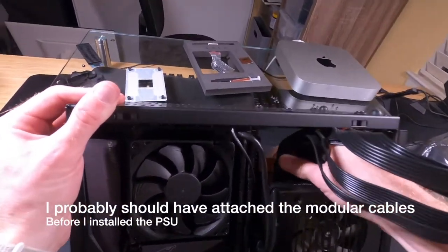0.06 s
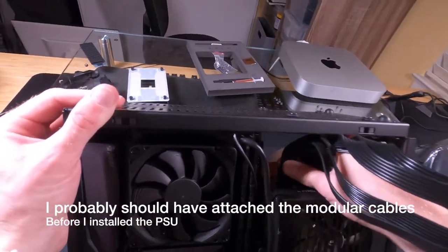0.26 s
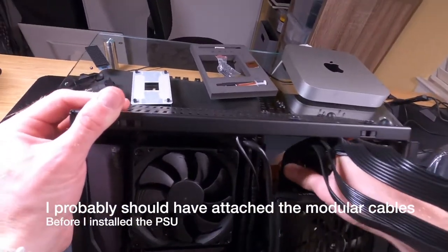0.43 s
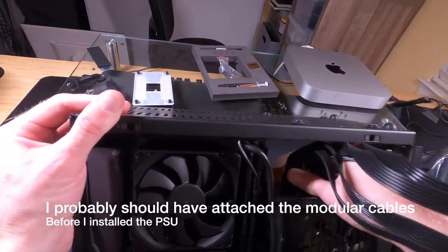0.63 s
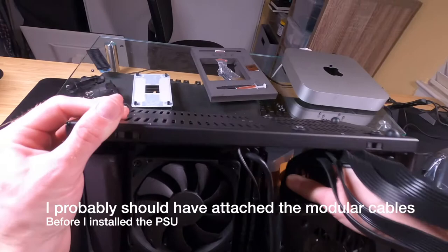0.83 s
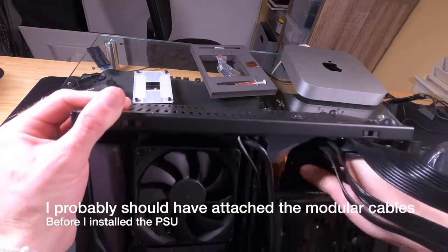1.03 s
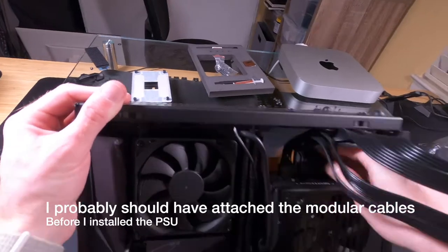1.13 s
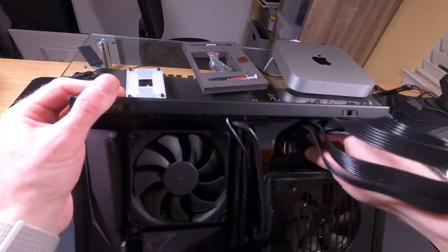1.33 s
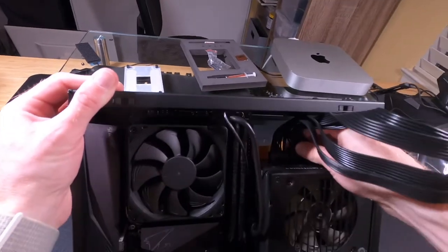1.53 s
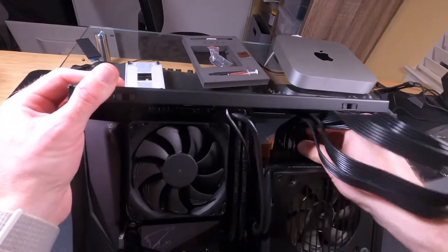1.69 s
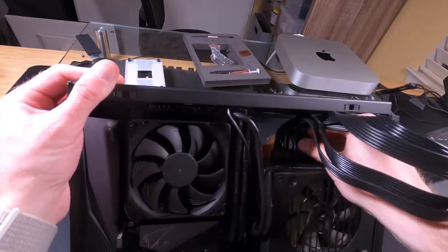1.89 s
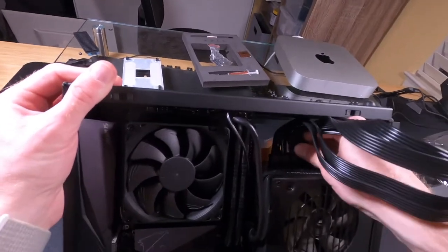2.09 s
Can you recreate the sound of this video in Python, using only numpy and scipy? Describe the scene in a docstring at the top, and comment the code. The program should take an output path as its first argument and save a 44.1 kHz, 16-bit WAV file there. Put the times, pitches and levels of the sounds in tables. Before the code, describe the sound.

A plastic plug creaks, snaps loudly into its socket, then cables rustle in a computer case.

```python
"""First come a low hum and a few faint taps, as stiff power cables are pushed about in a steel computer case.
A plastic plug creaks as it sticks and slips in its socket, snaps home with a loud click that
rings the case, and creaks again. Then the cables rustle, squeak and tap on the panels.
It all happens close by in a small room, over the hum and a low rumble."""
import sys
import numpy as np
from scipy import signal
from scipy.fft import rfft, irfft, next_fast_len
from scipy.io import wavfile
from scipy.ndimage import map_coordinates

SR = 44100
rng = np.random.default_rng(int(sys.argv[2]) if len(sys.argv) > 2 else 0)


def file_out(sig):
    """Save sig as 16-bit WAV at sys.argv[1]."""
    # one column per channel
    cols = np.atleast_2d(sig).T
    # limit, then scale
    lim = np.clip(cols, -1, 1)
    pcm = np.round(lim * 32767).astype(np.int16)
    wavfile.write(sys.argv[1], SR, pcm)


N = 94815
TIME = np.arange(N) / SR
AGE = np.arange(SR // 2) / SR  # seconds since a contact
SIDES = np.array([[.5], [-.5]])  # half to the left, the opposite half to the right


def amp(db):
    """Turns decibels into a gain."""
    return 10 ** (np.asarray(db) / 20)


def unit(x):
    """Scales a sound to an average (rms) level of 1."""
    return x / np.sqrt(np.mean(x ** 2) + 1e-20)


def along(points, hz):
    """Reads between (frequency, value) points on a log scale."""
    freqs, values = np.transpose(points)
    return np.interp(np.log(hz + 1), np.log(freqs + 1), values)


def curve(rows):
    """Joins (time, value) points with straight lines."""
    return np.interp(TIME, *np.transpose(rows))


def wobble(rate):
    """A smooth curve through `rate` random values a second."""
    return map_coordinates(rng.standard_normal(N // 100), [TIME * rate], mode="wrap")


def filtered(x, response):
    """Multiplies each frequency in x by response(hz)."""
    n = x.shape[-1]
    padded = next_fast_len(n + SR // 10)
    return irfft(rfft(x, padded) * response(np.fft.rfftfreq(padded, 1 / SR)), padded)[..., :n]


def burst(spectrum, t60):
    """Shaped noise that fades by 60 dB in t60 seconds."""
    noise = filtered(rng.standard_normal(SR // 2), lambda hz: amp(along(spectrum, hz)))
    return unit(noise) * amp(-60 * AGE / t60)


def ring(modes, scatter_db=0, detune=0):
    """The fading tones of a struck object; every second one starts upside down."""
    out = np.zeros(len(AGE))
    for k, (hz, db, t60) in enumerate(modes):
        fade = amp(db + scatter_db * rng.normal() - 60 * AGE / t60)
        pitch = hz * (1 + detune * rng.normal())
        out += (-1) ** k * fade * np.sin(2 * np.pi * pitch * AGE)
    return out


def rise(seconds):
    """The soft start of a contact."""
    return 1 - np.exp(-AGE / seconds)


def add(track, s, sound):
    """Mixes a sound into the track at time s."""
    part = track[round(s * SR):][:len(sound)]
    part += sound[:len(part)]


# how alike left and right are: (frequency [Hz], likeness [0 to 1])
LIKENESS = [(100, 0.78), (1000, 0.5), (3000, 0.35), (9000, 0.17)]
def spread(pair, spectrum):
    """Shapes two unrelated noises into a partly alike stereo pair."""
    def response(hz):
        angle = np.arccos(np.clip(along(LIKENESS, hz), -1, 1)) / 2
        return amp(along(spectrum, hz)) * [np.cos(angle), np.sin(angle)]
    mid, side = filtered(pair, response)
    return unit(np.array([mid + side, mid - side]))


# swells of the deep hum and the higher hum: (time [s], relative level [dB])
DRONE_LEVEL = [(0.0, -47.5), (0.17, -54.5), (0.2, -44.5), (0.48, -49), (0.69, -52.5), (0.78, -41.5),
               (0.85, -55.5), (0.99, -43), (1.16, -46.5), (1.21, -71), (1.27, -42), (1.38, -58.5),
               (1.62, -40), (1.81, -50), (1.87, -42.5), (1.98, -62.5), (2.02, -44.5), (2.15, -63.5)]
HUM_LEVEL = [(0, -68), (0.45, -63), (1.1, -57.5), (1.5, -62), (1.7, -53), (1.93, -70)]
# tone of the rumble and the room's air: (frequency [Hz], relative level [dB])
RUMBLE_TONE = [(15, 13), (30, 25), (55, 15.5), (75, 18), (110, 1.5), (200, -41)]
AIR_TONE = [(100, -7), (150, 4.5), (280, -11.5), (800, -22.5), (1150, -21), (2200, -32), (5000, -34.5),
            (8000, -42.5), (14000, -50), (15000, -64.5)]
def background(drone_hz=49.2, hum_hz=120.6):
    """A deep hum that swells and fades, a wavering higher hum, rumble and air."""
    drone = amp(curve(DRONE_LEVEL) + 0.5) * np.sin(2 * np.pi * drone_hz * TIME + 0.24 * wobble(3.8))
    hum_gain = amp(curve(HUM_LEVEL) + 1.5 * wobble(22))
    hum = hum_gain * np.sin(2 * np.pi * hum_hz * TIME + 0.3 * wobble(6.3))
    rumble = amp(-56) * spread(rng.standard_normal((2, N)), RUMBLE_TONE)
    air = amp(-62.5) * spread(rng.standard_normal((2, N)), AIR_TONE)
    return np.sqrt(2) * (drone + hum) + rumble + air


# how long the room echoes: (frequency [Hz], time to fade 60 dB [s])
ROOM_FADE = [(150, 0.69), (1200, 0.3), (4000, 0.15), (12000, 0.038)]
def room(x):
    """The small room adds a short echo whose treble dies first."""
    noise = spread(rng.standard_normal((2, SR // 2)), [(100, -2), (10000, 4.5)])
    hz, t, bands = signal.stft(noise, SR, nperseg=256)
    tail = signal.istft(bands * amp(-60 * t / along(ROOM_FADE, hz)[:, None]), SR, nperseg=256)[1]
    return signal.fftconvolve(x[None], tail / np.linalg.norm(tail[0]), axes=1)[:, :N]


# cable sleeves sliding, and the bundle dragging on the panels: (time [s], level [dB])
SLIDE_LEVEL = [(0, -78.5), (0.66, -74), (0.80, -58), (0.845, -69.5), (0.92, -57), (0.95, -63),
               (0.99, -53.5), (1.05, -61), (1.07, -75), (1.12, -65), (1.205, -63.5), (1.25, -74.5),
               (1.335, -66), (1.38, -78), (1.70, -77.5), (1.80, -70.5), (1.98, -82.5), (2.02, -67.5),
               (2.06, -71.5), (2.09, -78)]
DRAG_LEVEL = [(0, -63.5), (0.39, -67), (0.44, -41), (0.49, -62.5), (0.66, -63), (0.76, -45.5),
              (0.83, -50.5), (0.87, -62), (0.94, -60), (1.02, -55), (1.08, -60), (1.33, -62.5),
              (1.52, -68.5), (1.67, -60), (1.78, -61.5), (1.88, -60.5), (1.94, -54.5), (1.975, -64),
              (2.04, -58), (2.15, -69)]
# the tone of each: (frequency [Hz], relative level [dB])
SLIDE_TONE = [(700, -28.5), (1500, 5.5), (3200, 2.5), (4200, 2), (5200, 2.5), (7000, -5.5), (10000, -12.5),
              (15000, -29)]
DRAG_TONE = [(90, 13.5), (190, 9), (400, 2.5), (660, -6), (820, -8.5), (1080, 0), (1550, -8.5),
             (2100, -11.5), (4000, -25), (9000, -59)]
def rustle(catches_per_s=1000):
    """Rubbing cables make tiny catches of random size over a smooth hiss."""
    out = np.zeros((2, N))
    for level, tone in [(SLIDE_LEVEL, SLIDE_TONE), (DRAG_LEVEL, DRAG_TONE)]:
        caught = rng.random((2, N)) < catches_per_s / SR
        catches = caught * amp(4.5 * rng.standard_normal((2, N))) * rng.choice([-1, 1], (2, N))
        gain = amp(curve(level) + 1.6 * wobble(90))
        out += gain * spread(unit(catches) + 0.6 * rng.standard_normal((2, N)), tone)
    return out


# the side panel bending: (time [s], pitch [Hz], level [dB])
PANEL_FLEXES = [(0.269, 148, -50.5), (0.41, 174, -49.5)]
def flexes():
    """The panel gives way under the hand with a soft, low boom."""
    out = np.zeros(N)
    for s, hz, db in PANEL_FLEXES:
        add(out, s, ring([(hz, db, .28)]) * rise(seconds=.012))
    return out


# cables flicking each other: (time [s], level [dB])
CABLE_FLICKS = [(0.1431, -62.5), (0.2593, -67), (0.3476, -67), (0.409, -46), (0.522, -63), (0.921, -56),
                (0.936, -63), (0.9975, -52), (1.372, -68)]
# a flick's tone: (frequency [Hz], relative level [dB])
FLICK_TONE = [(1500, -21.5), (5000, -1.5), (7000, -10), (9500, -11), (15000, -28)]
def flicks():
    """Thin, dry ticks of plastic on plastic."""
    out = np.zeros(N)
    for s, db in CABLE_FLICKS:
        add(out, s, amp(db) * burst(FLICK_TONE, t60=0.023))
    return out


# cable sleeves squeaking: (middle time [s], half length [s], pitch [Hz], level [dB])
CABLE_SQUEAKS = [(0.925, 0.018, 4580, -62), (1.002, 0.011, 4430, -57), (1.203, 0.026, 5320, -64),
                 (1.33, 0.019, 3300, -66), (1.847, 0.01, 3120, -67.5), (2.037, .035, 4780, -69.5)]
def squeaks():
    """Thin, breathy squeaks that swell and fade with each rub."""
    out = np.zeros(N)
    width = 0.062  # share of the pitch
    for s, half, pitch, db in CABLE_SQUEAKS:
        band = filtered(rng.standard_normal(N), lambda hz: 1 / (1 + ((hz / pitch - 1) / width) ** 2))
        out += amp(db) * np.exp(-((TIME - s) / half) ** 2) * unit(band)
    return out


# short rubbery chirps: (time [s], pitch [Hz], level [dB])
SLEEVE_CHIRPS = [(0.5225, 1420, -44), (0.7903, 1556, -34.5)]
def chirps(half_length_s=.0019):
    """A sleeve squeaks for just a few vibrations."""
    out = np.zeros(N)
    for s, hz, db in SLEEVE_CHIRPS:
        t = TIME - s
        out += amp(db) * np.exp(-(t / half_length_s) ** 2) * np.sin(2 * np.pi * hz * t)
    return out


# the steel case's own tones: (pitch [Hz], relative level [dB])
CASE_MODES = [(121, -16), (171, -15), (229, -20), (365, -16), (425, -24), (495, -21), (650, -24),
              (921, -23), (1128, -20), (1254, -25), (1530, -21), (1960, -31), (2406, -25), (2686, -24),
              (2792, -22), (2843, -26), (3123, -24), (3618, -26)]
def case_ring(scatter_db=0):
    """The struck case rings, its low tones longest."""
    return ring([(hz, db, 0.14 * (1000 / hz) ** 0.15) for hz, db in CASE_MODES], scatter_db)


# cables hitting the case: (time [s], level [dB], relative tick level [dB], relative thud level [dB])
CABLE_TAPS = [(0.028, -62, -5.5, -20), (0.056, -56.5, -5.5, 2.5), (0.4076, -50.5, 4, -7),
              (0.569, -63.5, -18, 9), (0.582, -51, 2.5, 3), (0.8592, -71, 14, 11), (0.877, -57.5, 0, 6),
              (0.96, -62, 12.5, -2), (0.9715, -48.5, 4, -22), (1.035, -53, 0, -12), (1.048, -57.5, 0, -5),
              (1.299, -58.5, -3, -12), (1.686, -57.5, -15, -1.5), (1.732, -58, -5, -28),
              (1.8317, -58, 3.5, 3), (1.838, -64, 8.5, 12), (1.901, -56, -5, 8.5), (1.921, -68.5, -7, 15),
              (2.0317, -55, -11, 0)]
# tone of each part of a tap: (frequency [Hz], relative level [dB])
KNOCK_TONE = [(500, -21), (1050, 10), (1550, 7.5), (1950, -4), (2400, 0.5), (3500, -30.5), (7000, -26.5),
              (15000, -77)]
TICK_TONE = [(1200, -2.5), (2800, 10), (5000, 4), (7000, -10), (10000, -24.5), (15000, -21.5)]
THUD_TONE = [(80, -23.5), (200, -17), (420, 13.5), (700, -6.5), (1200, -40)]
def taps():
    """Each light tap is a knock that rings the case, a tick and a thud of the panel."""
    out = np.zeros(N)
    for s, db, tick_db, thud_db in CABLE_TAPS:
        knock = burst(KNOCK_TONE, t60=0.089) + amp(-4) * case_ring(scatter_db=3.5)
        tick = amp(tick_db) * burst(TICK_TONE, t60=0.0336)
        thud = amp(thud_db) * burst(THUD_TONE, t60=0.031)
        add(out, s, amp(db) * (knock + tick + thud) * rise(seconds=0.0004))
    return out


# the plug's two creaks, one list each: (time [s], slip rate [1/s], level [dB])
PLUG_CREAKS = [
    [(0.4085, 143, -32.5), (0.428, 186, -36), (0.442, 111, -32.5), (0.456, 140, -38.5), (0.464, 240, -60)],
    [(0.7003, 101, -35.5), (0.728, 113, -38), (0.745, 120, -36), (0.768, 150, -39), (0.785, 171, -35),
     (0.801, 233, -53.5)],
]
# the plug's tones; it rubs at another spot once it is home:
# (pitch [Hz], relative level in creak 1 [dB], in creak 2 [dB], time to fade 60 dB [s])
PLUG_MODES = [(335, -19, -15, 0.037), (746, -38, -24, .17), (1002, -11.5, -19, 0.14), (1190, -8, -7, .028),
              (1465, -10, -4.5, 0.035), (1615, -11, -10, 0.036)]
# a slip's scrape: (frequency [Hz], relative level [dB])
SCRAPE_TONE = [(200, -2), (700, -12), (1500, 12.5), (4000, 2.5), (7500, -5), (12000, -23), (16000, -45)]
def creaks(tick_hz=3730, ring_lag_s=.0018):
    """Plastic sticks and slips at an uneven rate; every slip ticks, then rings the plug."""
    out = np.zeros(N)
    for k, rows in enumerate(PLUG_CREAKS):
        times, rate, level = np.transpose(rows)
        modes = [(hz, levels[k], t60) for hz, *levels, t60 in PLUG_MODES]
        s = times[0]
        for jitter, scatter_db in rng.standard_normal(size=(22, 2)):
            gain = amp(np.interp(s, times, level) + scatter_db) * (s < times[-1]) * rise(seconds=.0006)
            tick = ring([(tick_hz, -3, .009)], detune=.015)
            scrape = amp(-12.5) * burst(SCRAPE_TONE, t60=.028)
            add(out, s, gain * (tick + scrape))
            add(out, s + ring_lag_s, gain * ring(modes, scatter_db=3, detune=0.003))
            s += np.exp(.03 * jitter) / np.interp(s, times, rate)
    return out


# tone of the rattling panels: (frequency [Hz], relative level [dB])
SHUDDER_TONE = [(100, -21.5), (200, 11), (480, -13.5), (760, -26), (980, -0.5), (1850, -9.5), (3060, -5),
                (5200, -18), (15000, -45.5)]
def shudder(start_s, t60=0.26, rise_s=0.0013):
    """After the snap the wide steel panels rattle on for a moment."""
    t = np.maximum(TIME - start_s, 0)
    fade = amp(-32.5 - 60 * t / t60 + 3 * SIDES)  # the loose panel lies to the left
    return fade * (1 - np.exp(-t / rise_s)) * spread(rng.standard_normal((2, N)), SHUDDER_TONE)


# the snap's two hits: (time [s], level [dB], relative crack level [dB])
SNAP_HITS = [(0.5922, -18, -2.5), (0.5938, -18, -5)]
# the latch's hard click and the plug's dead knock in its socket:
# (pitch [Hz], relative level [dB], time to fade 60 dB [s])
LATCH_MODES = [(1750, -5.5, .038), (2400, -6, 0.042), (3130, -10, .025), (4140, -11.5, .02),
               (5150, -9, .014), (6860, -18, .022)]
SOCKET_MODES = [(1120, 1, .026), (1520, -6, .024), (2085, -11, .035), (3500, -12, .025)]
# each hit's sharp crack: (frequency [Hz], relative level [dB])
CRACK_TONE = [(200, -2), (750, -14), (1400, -3), (2000, -14), (2900, 0), (5500, -1), (7500, -11),
              (10000, -12), (15500, -42)]
def snap():
    """The latch snaps over and the plug hits home, ringing the case."""
    out = np.zeros(N)
    for (s, db, crack_db), modes in zip(SNAP_HITS, [LATCH_MODES, SOCKET_MODES]):
        add(out, s, amp(db) * (ring(modes) + amp(crack_db) * burst(CRACK_TONE, t60=.015)))
    out = signal.lfilter(*signal.iirnotch(707, Q=3.6, fs=SR), out)  # the case hardly sounds at 707 Hz
    home_s, home_db, _ = SNAP_HITS[-1]
    add(out, home_s, amp(home_db) * case_ring())
    return out


# balance of the close sounds: (frequency [Hz], left minus right [dB])
BALANCE = [(300, -3), (1500, -0.2), (2800, 2.5), (5000, -1.8), (9000, 0.5), (13000, -11.5)]
def place(x, left_lag_s=4e-5):
    """The handling is slightly to the right, so it reaches the left side a little later."""
    def response(hz):
        delay = np.exp(-2j * np.pi * hz * SIDES * left_lag_s)
        return amp(SIDES * along(BALANCE, hz)) * delay
    return filtered(x, response)


def scene():
    """Mixes the close sounds, the echo of the contacts and the background."""
    contacts = snap() + creaks() + chirps() + squeaks() + taps() + flicks() + flexes()
    near = contacts + shudder(start_s=SNAP_HITS[-1][0]) + rustle()
    return place(near) + amp(-14.5) * room(contacts) + background()


def record(dry):
    """Cuts the very highest treble, above 15800 Hz."""
    return signal.sosfiltfilt(signal.butter(20, 15800, fs=SR, output="sos"), dry)


dry = scene()
out = record(dry)
file_out(out)
```